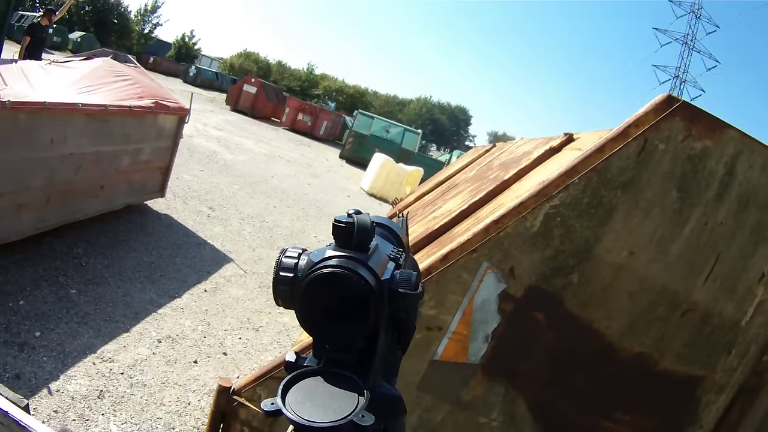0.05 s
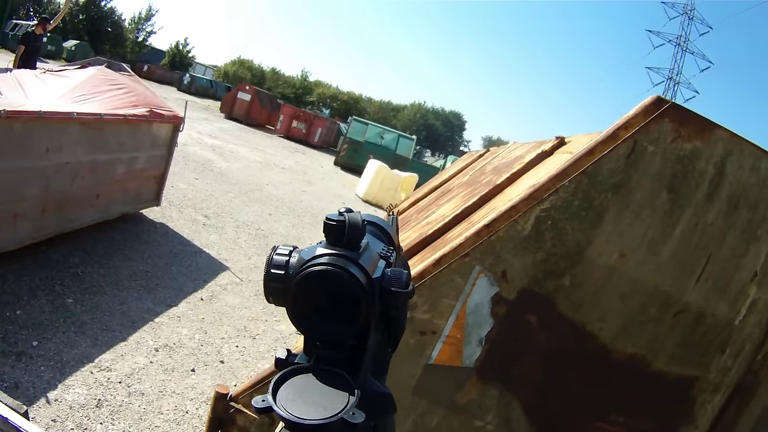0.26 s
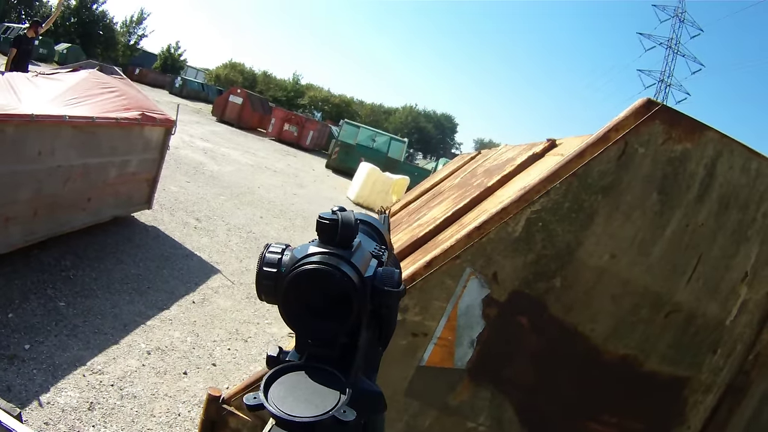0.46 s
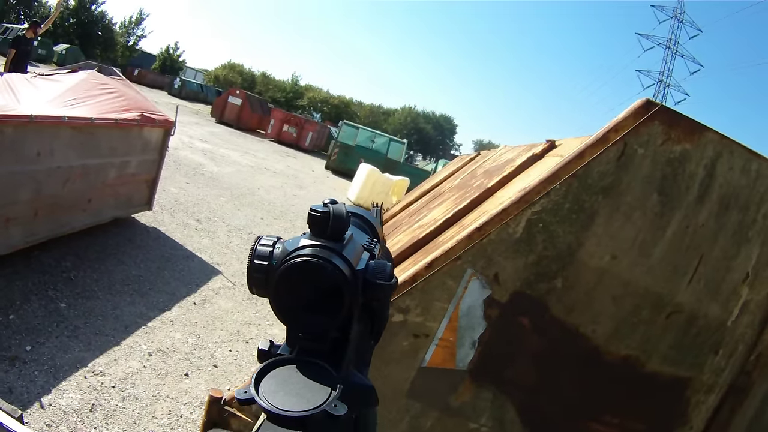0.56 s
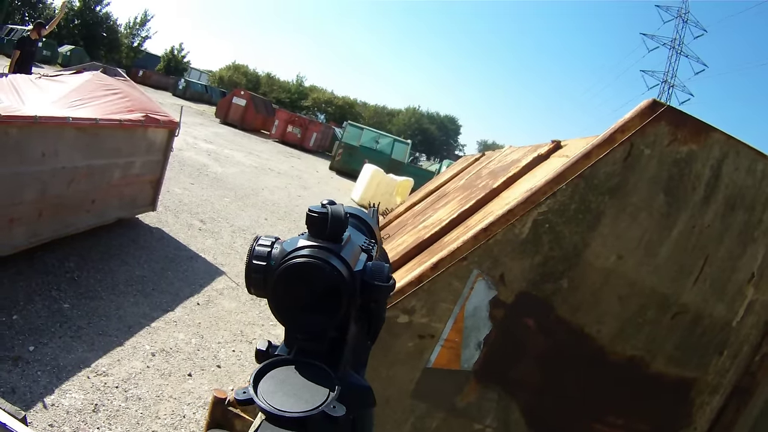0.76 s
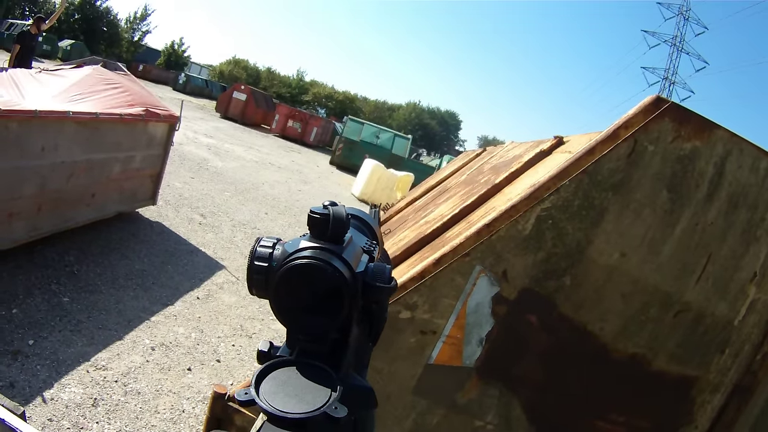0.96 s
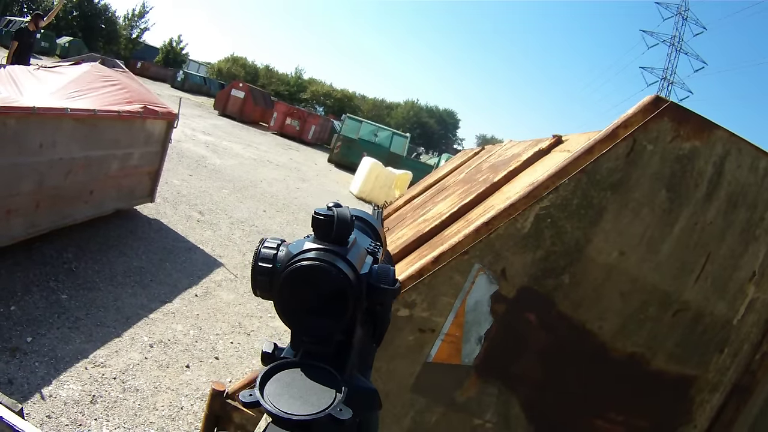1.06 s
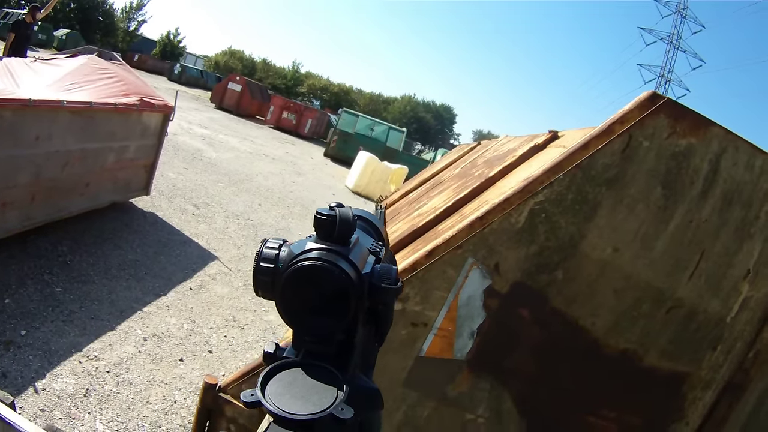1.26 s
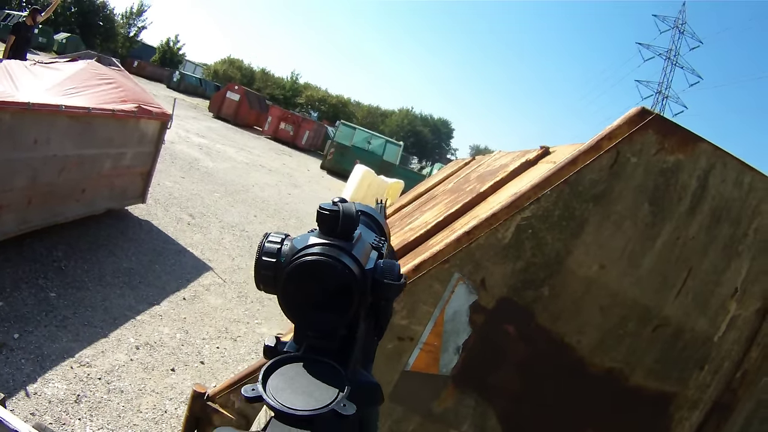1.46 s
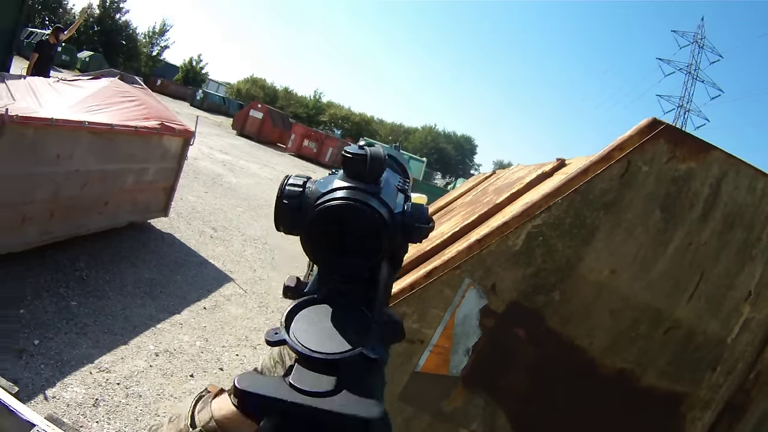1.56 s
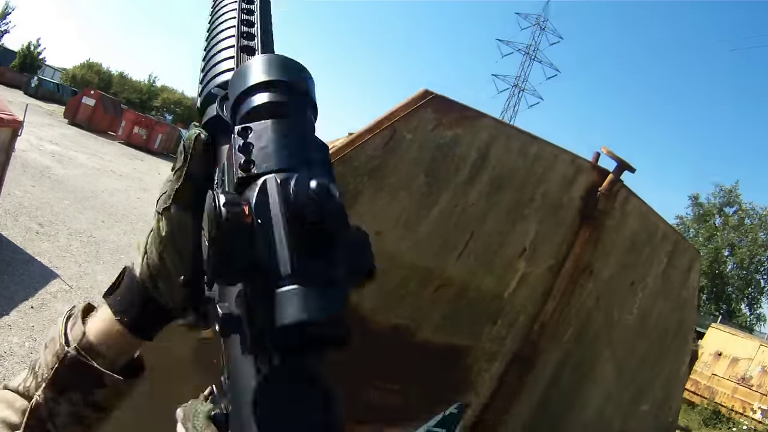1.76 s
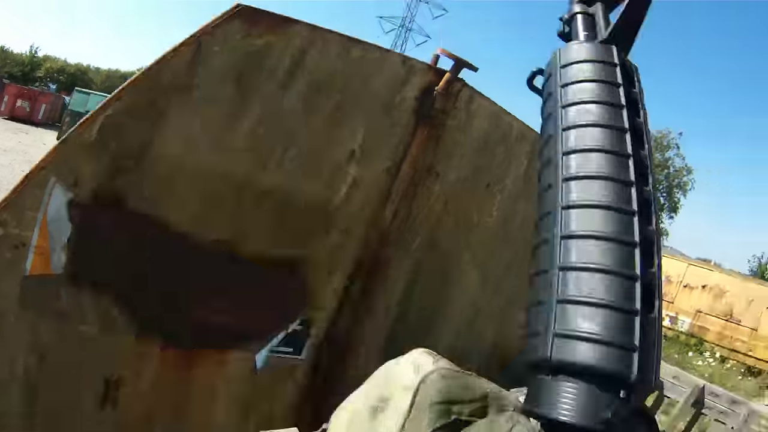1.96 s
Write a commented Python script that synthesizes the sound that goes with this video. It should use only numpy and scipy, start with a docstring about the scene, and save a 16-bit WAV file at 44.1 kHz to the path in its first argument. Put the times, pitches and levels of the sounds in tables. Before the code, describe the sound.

An electric airsoft rifle snaps six quick single shots up close, then knocks against gear outdoors

```python
"""An electric airsoft rifle fires six single shots, its stock close to a head-worn microphone, on open gravel.
Each shot: gear tooth tones spin up, the piston lets go, air thumps, body modes ring at the slam, gears coast down.
Trigger and loose parts click as short blows on those modes; at the end the lifted rifle knocks against gear.
Cloth and straps rustle as filtered grains and noise, over a shaped-noise open-air floor.
A short, dull noise tail is the yard's echo; the microphone cuts deep bass, and a limiter and clipping follow."""
import sys
import numpy as np
from scipy import signal
from scipy.fft import rfft, irfft
from scipy.io import wavfile
from scipy.ndimage import uniform_filter1d

SR = 44100
rng = np.random.default_rng(int(sys.argv[2]) if len(sys.argv) > 2 else 0)


def store_wav(level_fs):
    """Save 16-bit WAV to argv[1]."""
    pcm = np.round(np.clip(np.atleast_2d(level_fs), -1, 1) * 32767)
    wavfile.write(sys.argv[1], SR, pcm.T.astype(np.int16))


N = 88200  # 2 s

# Cloth and gear moving: (t/s, level/dB, scrape-band boost/dB)
RUSTLE_MOVES = [(0, -42.5, 9.5), (0.051, -53, 5.5), (0.159, -49, 5), (0.299, -21, 5), (0.421, -48, 3.5),
                (.6, -36, 5), (.9, -37.5, -1), (1.3, -33, -2), (1.498, -40.5, 5.5), (1.56, -47.5, 7.5),
                (1.62, -51, 17), (1.651, -45, 15), (1.691, -48.5, 8.5), (1.718, -30.5, 10.5),
                (1.755, -44, 5.5), (1.8, -46.5, 3.5), (1.9, -46, 2.5), (1.96, -39.5, -7), (2, -43, 12.5)]
# Spectrum of the cloth: (f/Hz, relative level per Hz/dB)
CLOTH_SPECTRUM = [(40, -30.5), (130, -13.5), (200, -12), (440, 2), (650, -3), (1700, -5), (3800, -30),
                  (10000, -31), (15500, -51.5)]
GRAINS_PER_S, SWELL_DB, SCRAPE_HZ = 2700, 2, 2560

# Spectrum of the open-air floor: (f/Hz, relative level per Hz/dB)
AIR_SPECTRUM = [(40, -2), (120, -3.5), (300, -4.5), (1000, -22.5), (4000, -30), (15500, -39)]
AIR_DB = -53.5

# Trigger, latch and loose parts: (t/s, level/dB, colour f/Hz, crack level/dB, ring time factor)
CLICKS_AND_KNOCKS = [(0.1642, -29, 2110, -13, 1.13), (.197, -7, 915, -27.5, 2.3),
                     (.343, -12.5, 1850, -6.5, 0.61), (0.363, -14, 1192, -19, 0.58),
                     (0.375, -25.5, 404, -22, 0.23), (0.438, -25.5, 1310, -19, 0.12),
                     (.4707, -11, 896, -41, 2.5), (0.5912, -15, 1510, -8.5, 0.45),
                     (0.654, -16, 1666, -12, 0.78), (0.655, -13.5, 756, -12.5, 1.06),
                     (.7136, -11, 930, -20, 2.17), (0.8911, -13.5, 970, -14, 0.92),
                     (0.892, -19, 1780, -23.5, 1.25), (0.902, -23.5, 500, -25, 0.45),
                     (.929, -27, 800, -36.5, 1.14), (0.9352, -10, 910, -47, 2.24),
                     (1.11, -20.5, 1720, -17.5, 1.42), (1.111, -23.5, 904, -8, 0.97),
                     (1.12, -14.5, 693, -24.5, 2.35), (1.296, -32.5, 910, -19.5, 0.89),
                     (1.1346, -9.5, 895, -34.5, 1.74), (1.3175, -15, 1480, -11, 0.9),
                     (1.3174, -13, 780, -15, 1.1), (1.3394, -12.5, 890, -26, 2.4),
                     (1.5161, -17, 940, -10.5, 1.03), (1.5181, -17.5, 2146, -28.5, 0.81),
                     (1.526, -24, 1050, -11.5, 2.55), (1.571, -34, 341.7, -35, 0.47),
                     (1.591, -15.5, 1340, -22, 0.345), (1.5911, -13, 820, -37.5, 0.147),
                     (1.599, -31.5, 200, -41, 0.405), (1.6, -26.5, 300, -34.5, 0.46),
                     (1.654, -37.5, 900, -19.5, 0.65), (1.676, -22.5, 1095, -33.5, 0.71),
                     (1.7009, -21, 1500, -18.5, 0.16), (1.7006, -22, 493, -35, 0.7),
                     (1.7087, -6.5, 1787, -24, 0.506), (1.7082, -9, 598, -29.5, 1.02),
                     (1.71, -2.5, 1940, -22, 0.62), (1.713, -6.5, 1490, -20, 0.34),
                     (1.7167, -14.5, 2250, -25, 0.19), (1.727, -39.5, 524, -27.5, 0.62),
                     (1.731, -24, 1750, -25.5, 0.45), (1.731, -25.5, 500, -28, 0.34),
                     (1.74, -29, 800, -22.5, 0.36), (1.744, -24.5, 520, -35.5, 0.32),
                     (1.7466, -32.5, 1900, -26, 0.236), (1.846, -29, 970, -28, 0.38),
                     (1.865, -30.5, 2550, -31, 0.22), (1.9428, -8.5, 1893, -27.5, 0.454),
                     (1.942, -26.5, 590, -35.5, 0.47), (1.998, -28.5, 602, -21.5, 1.12)]
# Nominal modes of the rifle body: (f/Hz, level/dB, t60/s)
BODY_MODES = [(160, -20.5, 0.079), (362, 0, 0.0532), (490, 4, 0.0508), (596.64, -3.5, 0.0464),
              (655, 4.5, 0.0226), (817.3, 6.5, 0.02307), (948.76, 8, 0.0135), (1275.3, -6, 0.04355),
              (1545.3, 1.5, 0.0299), (1783.6, -1, 0.0567), (1892.7, 1.5, 0.0292), (2090, 2, 0.0244),
              (2234, -1, 0.022), (2682, -4, 0.03083), (3528, -17, 0.017), (5084, -16, 0.0048),
              (7939, -13.5, .008), (10850, -20.5, 0.0052)]
CLICK_OCTAVES, RISE_S = .32, 0.000225
CRACK_T60, CRACK_WIDTH_HZ = 0.00731, 1500

YARD_DB, YARD_T60, YARD_TOP_HZ = -25.5, 0.1334, 2890

# Six shots: (piston release t/s, motor lead before it/s, power cut after it/s, gears level/dB,
#   release tick level/dB, air thump level/dB, slam base level/dB, slam colour f/Hz,
#   extra level of every second slam blow/dB)
SHOT_SETTINGS = [(.2497, 0.06555, 0.02334, -14, -0.5, -0.5, 6.5, 858, -2),
                 (0.5247, 0.0709, 0.0211, -16.5, -3, -2.5, 2.5, 856.6, -6),
                 (.7690, 0.0689, 0.0266, -18, -5, -3, 1, 862.6, 0.5),
                 (0.9883, 0.06756, 0.02553, -19.5, -6, -5, -0.5, 927.3, -5.5),
                 (1.1859, .072, 0.028, -20, -9, -5, -1.5, 871.4, -1.5),
                 (1.395, 0.0707, 0.026, -19, -11, -4.5, -0.5, 867, -3.5)]
# Tones of the gears: (multiple of tooth rate, level/dB)
TOOTH_ORDERS = [(.3, 0.5), (.47, -12), (.62, -16), (1, 6.5), (1.3, 2), (2, 2), (3, -15.5)]
# Spectrum of the grinding teeth: (f/Hz, relative level per Hz/dB)
GRIND_SPECTRUM = [(100, -51.5), (223, -29), (450, -6), (950, -4.5), (1340, -10), (2130, -6), (2700, -13.5),
                  (3500, -26.5), (4300, -35.5), (8000, -40), (15500, -59)]
# Bands of the fine whirr: (f/Hz, width/Hz, level/dB)
WHIRR_BANDS = [(3678, 217, 9), (5114, 1025, 4.5), (7750, 2630, 0.5), (10393, 2630, -3), (13500, 3300, -26)]
# Tooth rate: limit of the spin-up, time constants, and the drag that brings it to a stop
TOP_HZ, SPIN_UP_S, COAST_S, DRAG_HZ = 2047.5, .031, .075, 601.2
WOBBLE, WAVER_DB = 0.03029, 4.5  # rms wander: share of tooth rate, level of each tone
SPEED_POWER, BITE_S = 0.966, 0.00484  # loudness against speed; fade-in after motor start
# Load after release: eased, then taken up again, then faded out
UNLOADED_DB, TAKE_UP_S, TAKE_UP_DB = -4.5, 0.03934, 2.5
STOP_S, STOP_FADE_S = 0.0831, 0.0119
WHIRR_DB, WHIRR_BITE_S, WHIRR_POWER, WHIRR_FLICKER_DB = -12.5, 0.016, 1.21, 2.5
BODY_SHARE_DB, DIRECT_DB = 5.5, -1.5  # tones through the body modes, tones heard directly
GRIND_DB, GRIND_SPREAD_DB = 2.5, 1.5

# Times in the piston stroke count from its release
THUMP_S, THUMP_WIDTH_S, SECOND_THUMP_S, SECOND_THUMP_DB = 0.00491, 0.000455, 0.007854, -2.5
BOOM_HZ, BOOM_DB, BOOM_T60 = 189.7, -5.5, .036
HUM_HZ, HUM_DB, HUM_T60, HUM_RISE_S = 119.2, -23, 0.258, 0.025
# Slam and its rebounds: (t after the slam/s, level over slam base/dB, colour factor)
SLAM_BLOWS = [(0, 5.5, 1.07), (.0008, 5, 1.16), (.0037, 4.5, 0.9176), (.0047, 4, 1.5), (.0073, 1, 1.2)]
SLAM_S, SLAM_OCTAVES, SLAM_RING, CRACK_DB = .0112, .25, .8, -14.5
# Loose parts rattling after the slam
DEBRIS_DB, DEBRIS_T60, DEBRIS_PER_S, DEBRIS_HZ = -16.5, 0.0277, 4400, 2880
# Bands of the escaping air: (f/Hz, width/Hz, level/dB)
JET_BANDS = [(2780, 158, 14.5), (7345, 597, 6.5), (9990, 725, 1.5)]
JET_S, JET_RISE_S, JET_T60, JET_DB = 0.0143, 0.00095, 0.067, -15

MIC_LOW_HZ, EDGE_HZ = 114.9, 15650
# Limiter: threshold, cut per dB of excess, recovery of its level follower
LIMIT_DB, LIMIT_SHARE, RECOVER_DB_PER_S = -10, 0.309, 234.5


def gain_of(db):
    """Decibels to gain."""
    return 10 ** (np.asarray(db) / 20)


def evened(x):
    """Scales to rms 1."""
    return x / np.sqrt(np.mean(x ** 2) + 1e-20)


def add(mix, s, sound):
    """Mixes a sound in at s seconds, cutting what runs past the end."""
    part = mix[round(s * SR):][:len(sound)]
    part += sound[:len(part)]


def slow(n, size):
    """Noise smoothed twice over size samples, rms 1."""
    once = uniform_filter1d(rng.standard_normal(n), size)
    return evened(uniform_filter1d(once, size))


def colour(x, points):
    """Shapes x by a spectrum, interpolated over log frequency, and evens it."""
    f, db = np.transpose(points)
    hz = np.fft.rfftfreq(len(x), 1 / SR)
    level_db = np.interp(np.log(hz + 1), np.log(f + 1), db)
    return evened(irfft(rfft(x) * gain_of(level_db), len(x)))


def band(x, hz, width):
    """One resonance of peak gain 1."""
    return signal.lfilter(*signal.iirpeak(hz, hz / width, SR), x)


def noise_band(n, hz, width):
    """White noise through one resonance."""
    return band(rng.standard_normal(n), hz, width)


def grit(n, per_s, spread_db):
    """Random clicks; a wider spread makes a few of them large."""
    stretch_db = spread_db * np.minimum(rng.exponential(1, n), 5)
    size = gain_of(stretch_db) * rng.standard_normal(n)
    return size * (rng.random(n) < per_s / SR)


def rustle():
    """Fine scratching grains of cloth and straps over noise, brighter when they scrape."""
    s, db, treble_db = np.transpose(RUSTLE_MOVES)
    t = np.arange(N) / SR
    grains = evened(grit(N, GRAINS_PER_S, spread_db=0)) + 1.32 * rng.standard_normal(N)
    cloth = colour(grains, CLOTH_SPECTRUM)
    scrape_gain = gain_of(np.interp(t, s, treble_db)) - 1
    cloth += scrape_gain * band(cloth, SCRAPE_HZ, 1730)
    return cloth * gain_of(np.interp(t, s, db) + SWELL_DB * slow(N, size=400))


def open_air():
    """Steady noise floor of the open yard, strongest in the bass."""
    return gain_of(AIR_DB) * colour(rng.standard_normal(N), AIR_SPECTRUM)


def knock(colour_hz, octaves, treble_db, ring):
    """One blow on the body: modes near the colour frequency ring most, a short noise crack on top."""
    t = np.arange(0, .05, 1 / SR)
    hz, db, t60 = np.transpose(BODY_MODES[:-3])[:, :, None]
    distance = np.log2(hz / colour_hz) / octaves
    near = gain_of(db - 10.2 * distance ** 2 + rng.uniform(-3, 3.3, hz.shape))
    # each blow detunes the modes slightly
    turns = hz * rng.uniform(.98, 1.02, hz.shape) * t + rng.uniform(0, .1, hz.shape)
    modes = near * gain_of(-60 * t / (ring * t60)) * np.sin(2 * np.pi * turns)
    low = modes.sum(0) * (1 - np.exp(-t / RISE_S))
    crack = 0
    for f, level_db, _ in BODY_MODES[-4:]:
        narrow = band(noise_band(len(t), f, CRACK_WIDTH_HZ), f, CRACK_WIDTH_HZ)
        crack = crack + gain_of(level_db) * narrow
    crack_shape = gain_of(treble_db - 60 * t / CRACK_T60) * np.minimum(t / 0.000047, 1)
    return -low / abs(low).max() + evened(crack) * crack_shape


def yard(x):
    """A short dull scatter from ground and walls: sparse decaying clicks, low-passed, as an echo."""
    t = np.arange(0, .25, 1 / SR)
    tail = grit(len(t), 3000, 0.45) * gain_of(-60 * t / YARD_T60) * (t > .004)
    tail = signal.lfilter(*signal.butter(1, YARD_TOP_HZ, fs=SR), tail)
    return gain_of(YARD_DB) * signal.oaconvolve(x, tail / np.linalg.norm(tail))[:N]


def gears(lead, cut, level_db):
    """Tooth tones, grinding and a fine whirr follow the motor speed; tones swell where they cross a body mode."""
    t = np.arange(-lead, .13, 1 / SR)  # 0 is the piston release
    n = len(t)
    up = TOP_HZ * (1 - np.exp(-(np.minimum(t, cut) + lead) / SPIN_UP_S))
    coast = np.exp(-np.maximum(t - cut, 0) / COAST_S)
    hz = np.maximum((up + DRAG_HZ) * coast - DRAG_HZ, 1)
    turns = np.cumsum(hz * (1 + WOBBLE * slow(n, size=60))) / SR

    tones = 0
    for order, db in TOOTH_ORDERS:
        waver = gain_of(db + WAVER_DB * slow(n, size=120))
        tones = tones + waver * np.sin(2 * np.pi * (order * turns + rng.random()))
    tones = evened(tones)
    # grinding pulses once per tooth
    grind = colour(grit(n, 25000, GRIND_SPREAD_DB) * (0.947 + np.cos(2 * np.pi * turns)), GRIND_SPECTRUM)
    whirr = evened(sum(gain_of(db) * band(noise_band(n, f, w), f, w) for f, w, db in WHIRR_BANDS))

    load_times = [0, .012, TAKE_UP_S, TAKE_UP_S + 0.0142]
    load_db = np.interp(t, load_times, [0, UNLOADED_DB, UNLOADED_DB, TAKE_UP_DB])
    load = gain_of(load_db) / (1 + np.exp((t - STOP_S) / STOP_FADE_S * 2))
    bite = 1 / (1 + np.exp(-(t + lead - BITE_S) / 0.00264))
    shape = load * (hz / TOP_HZ) ** SPEED_POWER * bite
    whirr *= load * (hz / TOP_HZ) ** WHIRR_POWER * (t + lead > WHIRR_BITE_S)
    whirr *= gain_of(WHIRR_DB + WHIRR_FLICKER_DB * slow(n, size=40))

    rung = 0
    for k, (f, db, t60) in enumerate(BODY_MODES[1:]):
        # alternate signs between neighbouring modes
        rung = rung + (-1) ** k * gain_of(db) * band(shape * tones, f, 1.79 / t60)
    direct = gain_of(DIRECT_DB) * band(tones, 986, 1100) + gain_of(GRIND_DB) * grind
    return gain_of(level_db) * (gain_of(BODY_SHARE_DB) * rung + shape * direct + whirr)


def piston(tick_db, thump_db, slam_db, colour_hz, upper_db):
    """Release tick, push of air, slam with rebounds and rattle, then air hissing out."""
    t = np.arange(0, .2, 1 / SR)
    out = np.zeros(round(.2 * SR))
    add(out, 0, gain_of(tick_db) * knock(1904, 0.633, treble_db=-2, ring=0.535))

    # two pressure pulses, each led by a weaker dip
    for s, db in ((THUMP_S, 0), (SECOND_THUMP_S, SECOND_THUMP_DB)):
        u = (t - s) / THUMP_WIDTH_S
        out += gain_of(thump_db + db) * (np.exp(-u ** 2) - .5 * np.exp(-(u + 2) ** 2))
    u = np.maximum(t - THUMP_S + THUMP_WIDTH_S, 0)
    low_tones = ((BOOM_HZ, BOOM_DB, BOOM_T60, .0004), (HUM_HZ, HUM_DB, HUM_T60, HUM_RISE_S))
    for hz, db, t60, rise in low_tones:
        decay = gain_of(thump_db + db - 60 * u / t60)
        out += decay * np.sin(2 * np.pi * hz * u) * (1 - np.exp(-u / rise))

    for k, (s, db, tint) in enumerate(SLAM_BLOWS):
        # each later blow has 4 dB less crack
        blow = knock(colour_hz * tint, SLAM_OCTAVES, CRACK_DB - 4 * k, SLAM_RING)
        add(out, SLAM_S + s, gain_of(slam_db + db + upper_db * (k % 2)) * blow)
    u = np.maximum(t - SLAM_S, 0)
    debris = evened(band(grit(len(t), DEBRIS_PER_S, 1.07), DEBRIS_HZ, 2400))
    out += debris * (t > SLAM_S) * gain_of(slam_db + DEBRIS_DB - 60 * u / DEBRIS_T60)

    u = np.maximum(t - JET_S, 0)
    hiss = evened(sum(gain_of(db) * noise_band(len(t), f, w) for f, w, db in JET_BANDS))
    return out + hiss * np.minimum(u / JET_RISE_S, 1) * gain_of(slam_db + JET_DB - 60 * u / JET_T60)


def scene():
    """The rifle close by, its echo off the yard, the rustle and the open air, in one channel."""
    rifle = np.zeros(N)
    for s, db, hz, treble_db, ring in CLICKS_AND_KNOCKS:
        add(rifle, s, gain_of(db) * knock(hz, CLICK_OCTAVES, treble_db, ring))
    for s, lead, cut, gears_db, *blows in SHOT_SETTINGS:
        add(rifle, s - lead, gears(lead, cut, gears_db))
        add(rifle, s, piston(*blows))
    return (rifle + yard(rifle) + rustle() + open_air())[None]


def record(dry):
    """The microphone drops deep bass, a limiter turns loud moments down, peaks clip, then the band limit."""
    heard = signal.lfilter(*signal.butter(2, MIC_LOW_HZ, "high", fs=SR), dry)
    power = uniform_filter1d(heard[0] ** 2, size=300, origin=149)  # over the last 7 ms or so
    power_db = 10 * np.log10(abs(power) + 1e-12)
    # the follower rises at once and falls at a steady rate
    fall = np.arange(N) * RECOVER_DB_PER_S / SR
    held_db = np.maximum.accumulate(power_db + fall) - fall
    over_db = np.maximum(held_db - LIMIT_DB, 0)
    cut_db = LIMIT_SHARE * uniform_filter1d(over_db, size=100)
    clipped = np.clip(heard / gain_of(cut_db), -1, 1)
    low_pass = signal.firwin(511, EDGE_HZ, window=("kaiser", 9), fs=SR)[None]
    return np.clip(signal.oaconvolve(clipped, low_pass, "same"), -1, 1)


dry = scene()
out = record(dry)
store_wav(out)
```